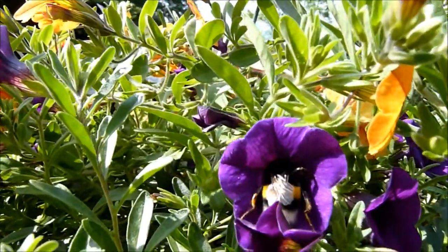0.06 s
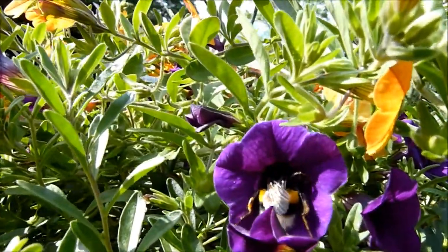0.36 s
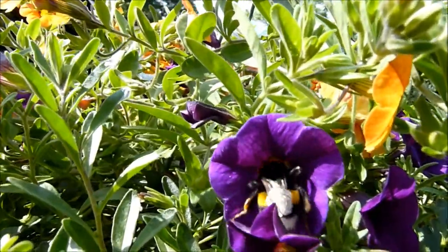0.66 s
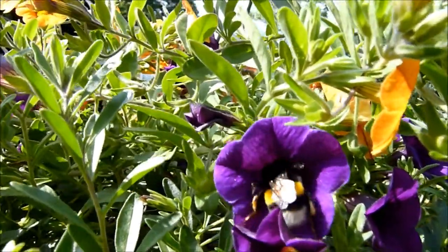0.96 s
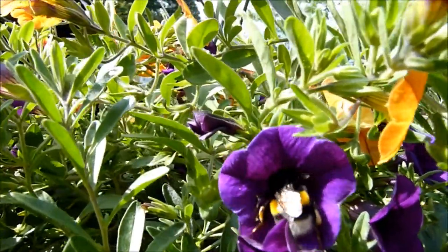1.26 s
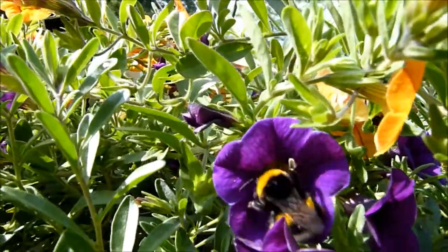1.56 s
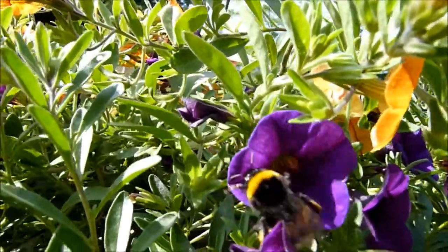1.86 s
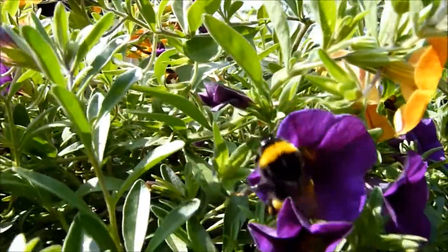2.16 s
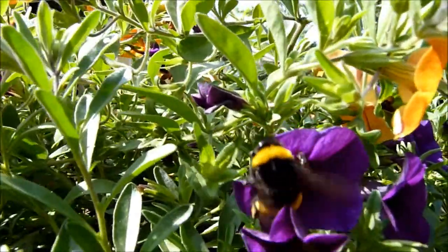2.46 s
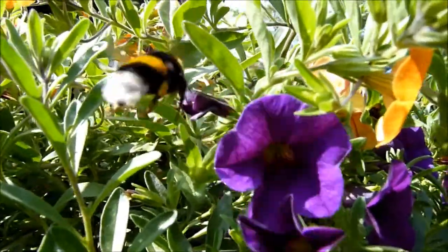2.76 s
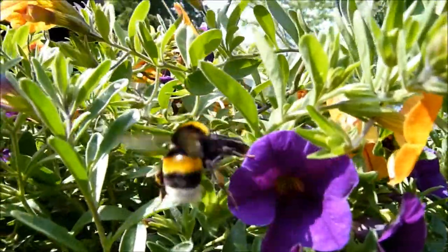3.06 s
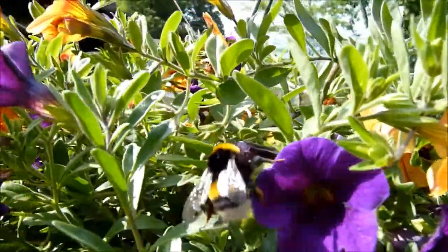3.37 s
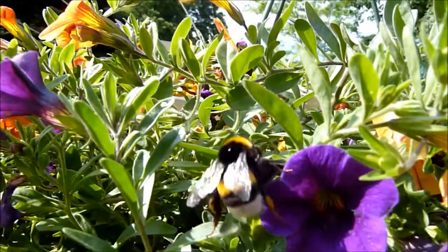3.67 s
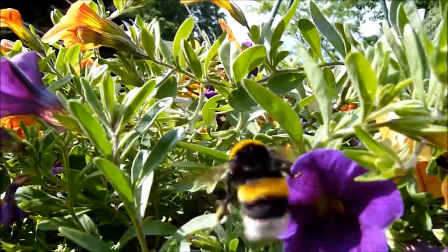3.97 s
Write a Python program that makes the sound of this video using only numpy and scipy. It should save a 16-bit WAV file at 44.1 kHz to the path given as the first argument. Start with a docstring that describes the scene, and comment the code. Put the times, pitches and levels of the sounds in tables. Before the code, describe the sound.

A bumblebee buzzes close by in a quiet garden. At first there is only soft outdoor hiss and faint distant bees. From about 1.4 to 2.3 seconds, low wind puffs bump the microphone, with faint rustles. At 2.6 the buzz starts, wings ticking quickly against a petal. It wavers, strongest until 3 seconds, then drops in pitch and fades by 3.2. The buzz starts again at 3.9.

```python
"""Bumblebee leaving a flower.

A bumblebee clambers out of a bloom with faint rustles while puffs of air buffet the microphone.
It takes off, clips a petal with its wings, hovers past a small camera, lands, then starts again.
Wing strokes make the hum, wing flips the overtones. Far bees hum over garden wash and camera hiss."""
import sys
import numpy as np
from scipy import signal
from scipy.fft import rfft, irfft
from scipy.io import wavfile

SR = 44100
rng = np.random.default_rng(int(sys.argv[2]) if len(sys.argv) > 2 else 0)


def wav_out(sig):
    """Save sig, one row per channel (or a flat mono array), as 16-bit PCM at SR to the path in sys.argv[1]."""
    wavfile.write(sys.argv[1], SR, np.round(np.clip(np.atleast_2d(sig).T, -1, 1) * 32767).astype(np.int16))


N = 176400
FLUTTER_HZ, SNAP_LEAD_S = 110, 0.001205  # wing jitter bandwidth; flip ahead of stroke


def amp(db):
    """Decibels to gain."""
    return 10 ** (np.asarray(db) / 20)


def unit(x):
    """Scale to rms 1."""
    return x / np.sqrt(np.mean(x ** 2) + 1e-20)


def curves(rows):
    """Each value column of a time table, at every sample."""
    time_s, *columns = np.transpose(rows)
    return [np.interp(np.arange(N) / SR, time_s, column) for column in columns]


def read(points, hz):
    """Interpolate a spectrum on a log axis."""
    freq_hz, value = np.transpose(points)
    return np.interp(np.log(hz + 1), np.log(freq_hz + 1), value)


def drift(rate_hz):
    """Smooth random wobble, rms 1."""
    hz = np.fft.rfftfreq(N, 1 / SR)
    return unit(irfft(rfft(rng.standard_normal(N)) * np.exp(-(hz / rate_hz) ** 2) * (hz > 0), N))


def noise(tone, correlation=None):
    """Stereo noise, rms 1, of given spectral shape and left-right correlation."""
    # default left-right likeness: freq_hz, correlation
    likeness = [(30,0.66),(100,1),(250,0.99),(700,0.93),(1400,0.64),(2500,0.065)]
    hz = np.fft.rfftfreq(N, 1 / SR)
    if correlation is None:
        correlation = read(likeness, hz)
    mid, side = rfft(rng.standard_normal((2, N))) * amp(read(tone, hz))
    mid, side = mid * np.sqrt(1 + correlation), side * np.sqrt(1 - correlation)
    return unit(irfft(np.array([mid + side, mid - side]), N))


def burst(start_s, rise_s, decay_s):
    """Envelope: linear rise, exponential decay."""
    t = np.arange(N) / SR - start_s
    return np.clip(t / rise_s, 0, 1) * np.exp(-np.maximum(t - rise_s, 0) / decay_s)


def garden():
    """Distant outdoor wash, gently uneven."""
    # wash spectrum: freq_hz, gain_db
    tone = [(20,-11),(55,1.5),(120,-3),(230,-0.5),(400,-10),(580,-8),(770,-13),(880,-9.5),(990,-13.5),(2200,-23.5),(4000,-30.5),(16000,-57)]
    return noise(tone) * amp(-53.5 + 1.26 * drift(rate_hz=11))


def camera_hiss():
    """Steady self-noise of the camera."""
    # hiss spectrum: freq_hz, gain_db
    tone = [(100,3),(1500,-1.5),(3300,0.5),(6000,1),(9000,-2.5),(14000,-5.5),(15300,-10),(16000,-33)]
    return noise(tone) * amp(-63.5)


def wings(cycles, beat_hz, fundamental_db, octave_db, snap_db, attitude):
    """Stroke and return give two low tones; the wing's flip adds one snap of overtones a beat."""
    # overtones at attitude -1 (lifting), 0 (side-on), 1 (turned): harmonic, gain_db
    lifting = [(3,-3),(4,-6.5),(5,-2.5),(6,-2.5),(7,-4),(8,-13),(12,-21.5),(20,-31)]
    side_on = [(3,6.5),(4,-9),(5,-9),(6,-3),(7,-5),(8,-24),(9,-16),(12,-25),(14,-20.5),(20,-41)]
    turned = [(3,-1.5),(4,1.5),(5,-3),(6,-8.5),(7,-21),(8,-11.5),(9,-29),(12,-19),(14,-40),(20,-36)]
    knee_harmonic, blur_rad = 2.9, 0.059  # lead starts above the knee; blur is per harmonic
    harmonics = np.arange(1, 21)
    spectra = [amp(read(tone, harmonics)) for tone in (lifting, side_on, turned)]
    spectra = [gains / np.linalg.norm(gains[2:]) for gains in spectra]
    lead_s = SNAP_LEAD_S - 0.0001 * attitude
    out = 0
    for n, *shares in zip(harmonics, *spectra):
        if n <= 2:
            gain = amp(fundamental_db if n == 1 else octave_db)
        else:
            gain = amp(snap_db) * np.interp(attitude, [-1, 0, 1], shares)
        lead_cycles = lead_s * beat_hz * max(n - knee_harmonic, 0)
        flutter_rad = blur_rad * n * drift(FLUTTER_HZ)
        out += gain * np.cos(2 * np.pi * (n * cycles + lead_cycles) + flutter_rad)
    return np.sqrt(2) * out


def far_bees():
    """Two faint wing hums that wander in pitch and swell."""
    # distant bees: beat_hz, fundamental_db, octave_db, overtones_db
    bees = [(117.9,-60.5,-68.5,-71.5),(108.76,-78,-59.5,-70)]
    # their common swell: time_s, gain_db
    swell = [(0,-7),(.5,-1.5),(1.15,-1),(1.5,-12),(2.1,-1.5),(3.3,-4)]
    out = 0
    for beat_hz, *levels_db in bees:
        cycles = np.cumsum(beat_hz * (1 + 0.0218 * drift(rate_hz=3.8))) / SR
        out += wings(cycles, beat_hz, *levels_db, attitude=1)
    return out * amp(curves(swell)[0])


def wind():
    """Low turbulence at the microphone ports, and single eddies that push, then suck."""
    # breeze: time_s, level_db, left_minus_right_db
    breeze = [(0,-71,9),(.4,-64,2),(1.28,-66,-6),(1.38,-46.5,-5),(1.48,-47,-2),(1.54,-57,9),(1.59,-41.5,-10),(1.69,-39,6),(1.73,-48.5,7),(1.87,-42.5,4),(2.0,-59,18),(2.17,-53.5,-3),(2.24,-42.5,2),(2.33,-56.5,6),(3.1,-57,4),(3.19,-44.5,-2),(3.33,-63,1),(3.7,-55.5,-3),(3.8,-49,-2),(4,-58,9)]
    # turbulence spectrum: freq_hz, gain_db
    tone = [(20,-30),(45,-5),(80,-1),(110,-4),(170,-6),(300,-20),(600,-28.5),(1500,-55)]
    # eddies: centre_s, level_db, half_width_s, pan (-1 left, 1 right)
    puffs = [(1.574,-25.5,0.0021,0.54),(1.604,-33,0.0037,.6),(1.6135,-15,0.0025,0.73),(1.6217,-21,0.0013,0.58),(1.677,-22.5,0.0024,.9),(1.6874,-28,.0024,.7),(1.7442,-30,0.0039,-0.96),(1.8146,-30,0.0014,-0.43),(1.8648,-23,0.0045,-0.48)]
    level_db, balance_db = curves(breeze)
    ports = amp(np.array([balance_db, -balance_db]) / 2)
    ports /= np.sqrt((ports ** 2).mean(0))
    out = noise(tone, correlation=0.71) * amp(level_db - 1) * ports
    for centre_s, puff_db, half_width_s, pan in puffs:
        u = (np.arange(N) / SR - centre_s) / half_width_s
        pressure = amp(puff_db) * np.sin(-2 * u) * np.exp(-u ** 2)
        out += np.array([[1 - pan], [1 + pan]]) / 2 * pressure
    return out


def leg_rustles():
    """Legs scratch softly over petals and leaves."""
    # scratches: start_s, level_db, decay_s
    rustles = [(.512,-61.5,.01),(1.508,-63.5,0.037),(1.738,-60.5,0.035),(1.886,-52.5,0.0014),(2.471,-54,0.005),(2.551,-57,.004)]
    # scratch spectrum: freq_hz, gain_db
    tone = [(800,-26),(2500,2),(4000,6),(6300,14),(8500,8),(10800,3),(15000,-24)]
    rise_s = 0.0029
    envelope = sum(amp(db) * burst(start_s, rise_s, decay_s) for start_s, db, decay_s in rustles)
    return envelope * noise(tone, correlation=0.85)


def air_throb():
    """Air throbs at the microphone, mostly left: a low, wavering, sinking tone."""
    # throb: time_s, pitch_hz, level_db
    glide = [(1.66,120,-49),(1.745,97.9,-47.5),(1.8,86.6,-40),(1.83,84,-49),(1.862,85.6,-31.5),(1.89,74.4,-44),(1.95,70.6,-44.5),(1.99,66,-57)]
    pan, waver = -0.52, 0.1
    t = np.arange(N) / SR
    pitch_hz, level_db = curves(glide)
    cycles = np.cumsum(pitch_hz * (1 + waver * drift(rate_hz=47))) / SR
    tone = np.sqrt(2) * np.sin(2 * np.pi * cycles)
    gate = (t > glide[0][0]) & (t < glide[-1][0])
    envelope = amp(level_db + 1.5 * drift(rate_hz=21)) * gate
    return np.array([[1 - pan], [1 + pan]]) * tone * envelope


def wing_swish(cycles):
    """Air hisses off the wings, peaking mid-stroke."""
    # swish: time_s, level_db
    swish = [(2.42,-110),(2.5,-62.5),(2.56,-55.5),(2.61,-58.5),(2.71,-58.5),(2.8,-56),(2.88,-57.5),(2.93,-52),(2.99,-61),(3.15,-65.5),(3.4,-88),(3.88,-75),(3.99,-57)]
    # swish spectrum: freq_hz, gain_db
    tone = [(300,-6),(900,8.5),(2000,-3.5),(3500,-3.5),(6500,-2),(10000,-5.5),(16000,-8.5)]
    pulsing = unit(1 - 0.51 * np.cos(2 * np.pi * cycles))
    return noise(tone) * amp(curves(swish)[0]) * pulsing


def wing_turbulence(cycles, beat_hz, snap_db):
    """Each flip rasps and sheds a rough wake, strongest as the bee swerves."""
    # wake relative to the overtones: time_s, gain_db
    wake_gain = [(2.66,-11),(2.745,-17),(2.785,-7.5),(2.815,-5),(2.86,-11),(2.89,-16),(2.95,-11),(2.98,-13)]
    # wake and rasp spectra: freq_hz, gain_db
    wake_tone = [(150,-9),(400,-1.5),(680,-2.5),(1100,-13),(1700,-27),(6000,-41)]
    rasp_tone = [(700,-27),(1650,-5),(4000,-21)]
    sharpness, steady_wake = 2.2, 1.1  # steady part relative to the flip pulses
    flip = unit(np.exp(sharpness * np.cos(2 * np.pi * (cycles + SNAP_LEAD_S * beat_hz))))
    wake = noise(wake_tone) * amp(snap_db + curves(wake_gain)[0]) * unit(flip + steady_wake)
    rasp = noise(rasp_tone) * amp(snap_db - 26.5) * flip
    return wake + rasp


def near_bee():
    """Two close flights; one wing beat drives tones, turbulence and swish."""
    # first flight, wing rate: time_s, beat_hz
    beat = [(2.56,112.6),(2.585,124.9),(2.62,143.1),(2.635,152.6),(2.666,139.3),(2.694,154.2),(2.752,149),(2.812,134.5),(2.84,144.1),(2.868,138.6),(2.9,150),(2.918,146),(2.952,159),(2.982,139.6),(3.05,125.9),(3.125,109),(3.2,107.8)]
    # first flight, buzz: time_s, fundamental_db, octave_db, overtones_db
    buzz = [(2.56,-67,-48.5,-58),(2.585,-58,-46.5,-55),(2.612,-60,-39.5,-46),(2.636,-41.5,-37,-50),(2.66,-47,-47,-39.5),(2.676,-51,-38.5,-52),(2.692,-41.5,-36.5,-42.5),(2.75,-37.5,-37,-36),(2.808,-42,-42,-40),(2.848,-40,-41,-36.5),(2.872,-44,-40,-43),(2.905,-38.5,-39,-38),(2.948,-38.5,-37.5,-39.5),(3.01,-47.5,-45.5,-43.5),(3.11,-53.5,-53,-51.5),(3.2,-61,-67,-61.5)]
    # second start: time_s, beat_hz, fundamental_db, octave_db, overtones_db
    restart = [(3.901,115.4,-66,-70,-68),(3.955,123.4,-58,-56,-57),(3.981,135.7,-45.5,-43,-48),(4.0,140.4,-70,-38,-39)]
    # body turn: time_s, attitude (-1 lifting, 0 side-on, 1 turned)
    turn = [(2.61,-1.4),(2.645,-.3),(2.662,0.86),(2.69,0.18),(2.752,0.26),(2.785,0.61),(2.855,0.83),(2.89,0.28),(2.955,0.14),(2.985,0.53),(3.1,0.98),(3.9,-0.96)]
    jitter, fade_s, strike_s = 0.0051, 0.042, 2.6393
    t = np.arange(N) / SR
    beat_hz, = curves(list(beat) + [row[:2] for row in restart])
    fundamental_db, octave_db, snap_db = curves(list(buzz) + [(row[0], *row[2:]) for row in restart])
    attitude = np.clip(curves(turn)[0], -1, 1)
    cycles = np.cumsum(beat_hz * (1 + jitter * drift(FLUTTER_HZ))) / SR
    cycles -= np.interp(strike_s, t, cycles)  # a flip falls on the hardest petal strike
    flying = 0
    for flight in (buzz, restart):
        inside_s = np.minimum(t - flight[0][0], flight[-1][0] - t)
        flying += np.clip(1 + inside_s / fade_s, 0, 1)
    tones = wings(cycles, beat_hz, fundamental_db, octave_db, snap_db, attitude)
    return flying * (tones + wing_turbulence(cycles, beat_hz, snap_db)) + wing_swish(cycles)


def petal_strikes():
    """Wing tips hit a petal: bright ticks with faint tails."""
    # hits: start_s, level_db, decay_s
    strikes = [(2.6279,-39,.0007),(2.6330,-33.5,0.0009),(2.6393,-30,0.00054),(2.6458,-41,0.00073),(2.6528,-47,.0008),(2.6601,-44,0.00077),(2.6888,-31,0.00031),(2.6953,-32.5,0.00038),(2.7103,-44,0.0013)]
    # tick spectrum: freq_hz, gain_db
    tone = [(400,-2),(1250,6),(3500,-4),(5400,1.5),(7000,-2.5),(8700,3.5),(11300,-4),(13300,4),(16500,-8)]
    rise_s, envelope = 0.0002, 0
    for start_s, level_db, decay_s in strikes:
        tail = amp(-21) * burst(start_s, rise_s, decay_s=0.01)
        envelope += amp(level_db) * (burst(start_s, rise_s, decay_s) + tail)
    return envelope * noise(tone, correlation=0.78)


def scene():
    """All sources at the two microphone ports."""
    background = garden() + camera_hiss() + far_bees()
    return background + wind() + leg_rustles() + air_throb() + near_bee() + petal_strikes()


def record(dry):
    """The camera's three notches, then its band limit."""
    # notch filters: centre_hz, width_hz
    notches = [(2620,606),(4620,700),(7980,380)]
    for centre_hz, width_hz in notches:
        dry = signal.lfilter(*signal.iirnotch(centre_hz, centre_hz / width_hz, SR), dry)
    lowpass = signal.firwin(401, cutoff=15850, window=("kaiser", 8), fs=SR)
    return signal.oaconvolve(dry, lowpass[None], "same")


dry = scene()
out = record(dry)
wav_out(out)
```